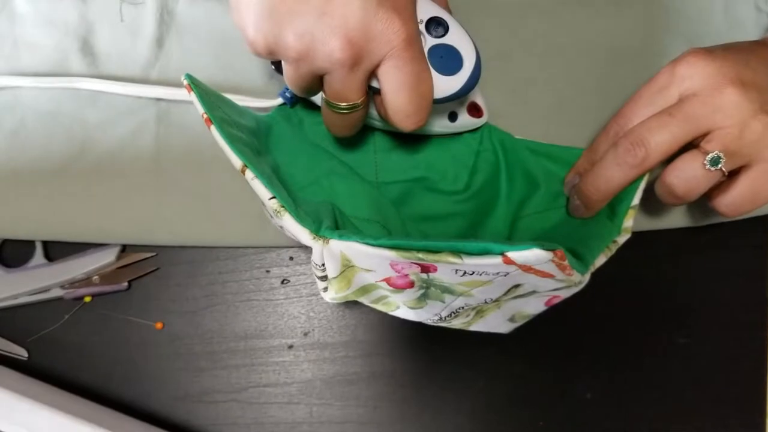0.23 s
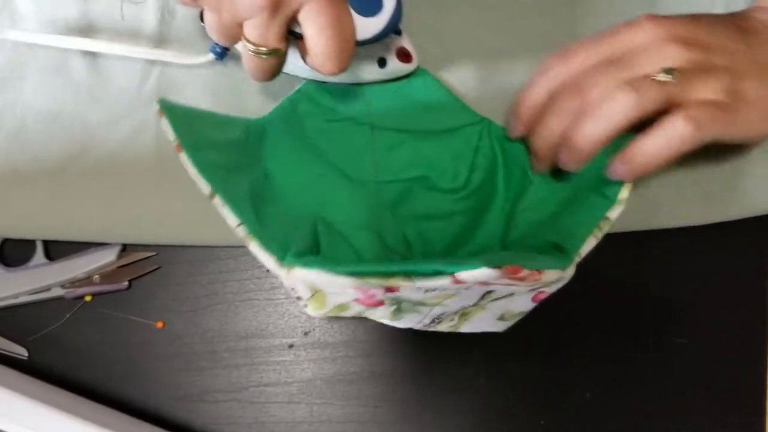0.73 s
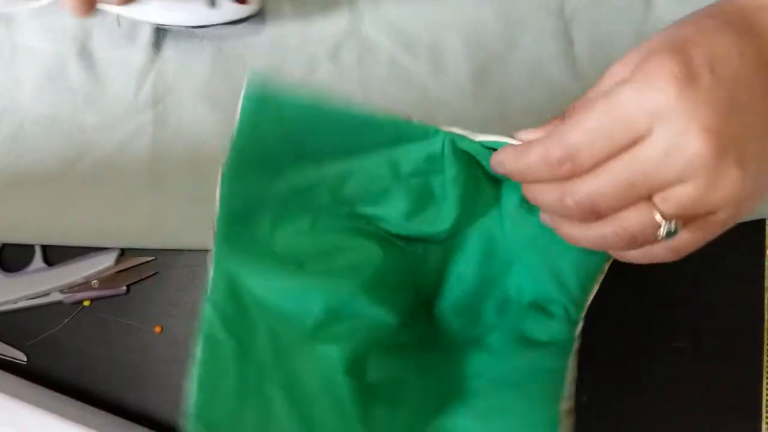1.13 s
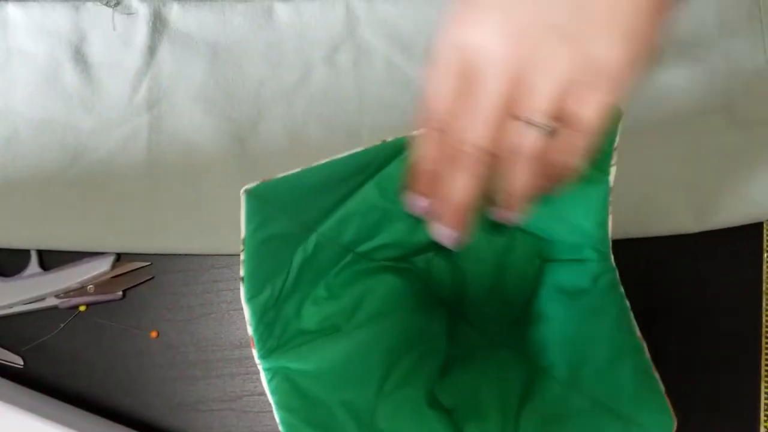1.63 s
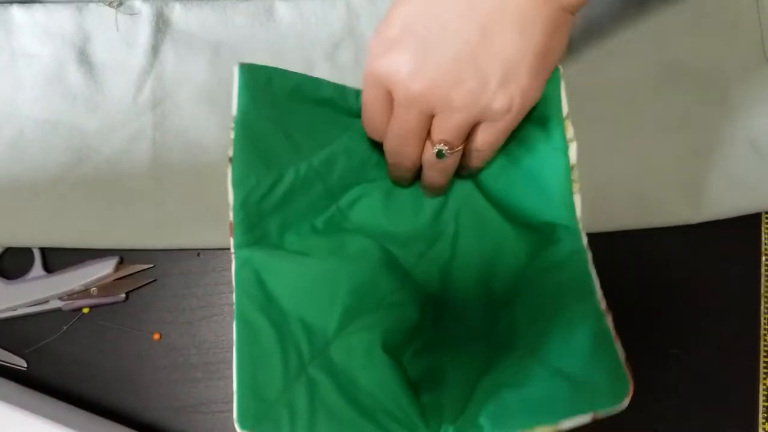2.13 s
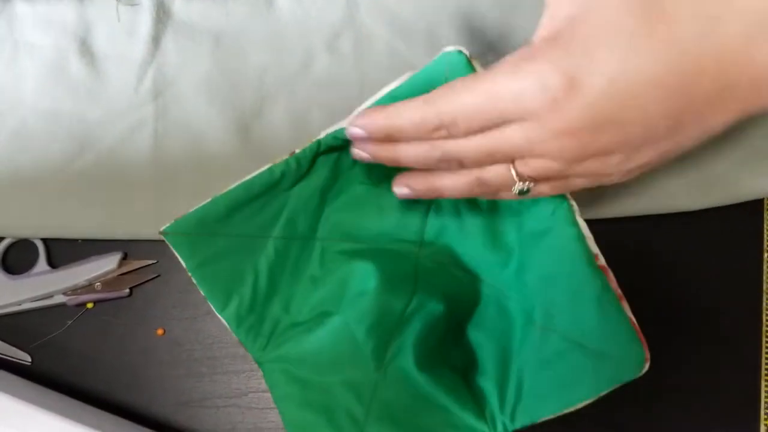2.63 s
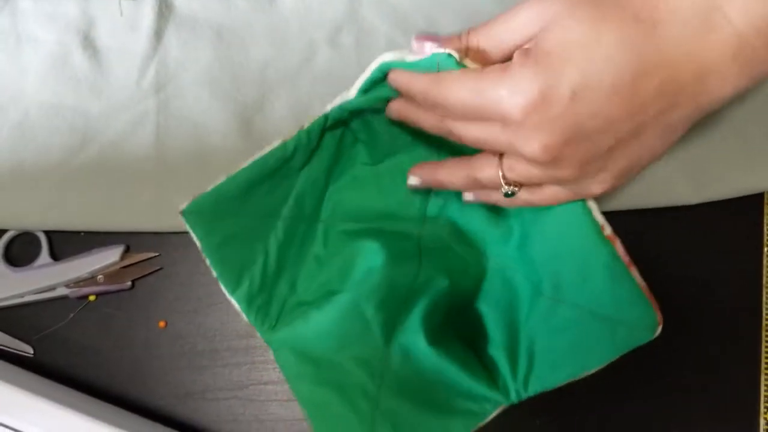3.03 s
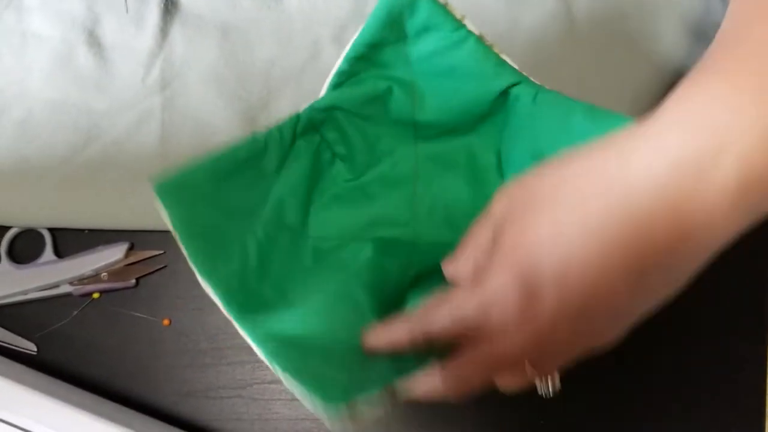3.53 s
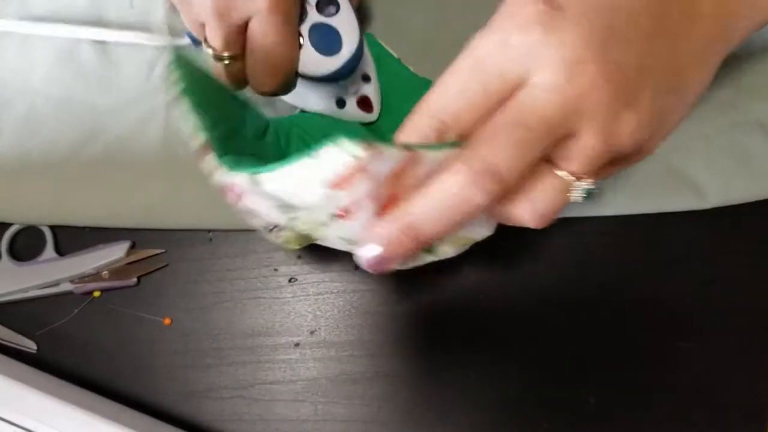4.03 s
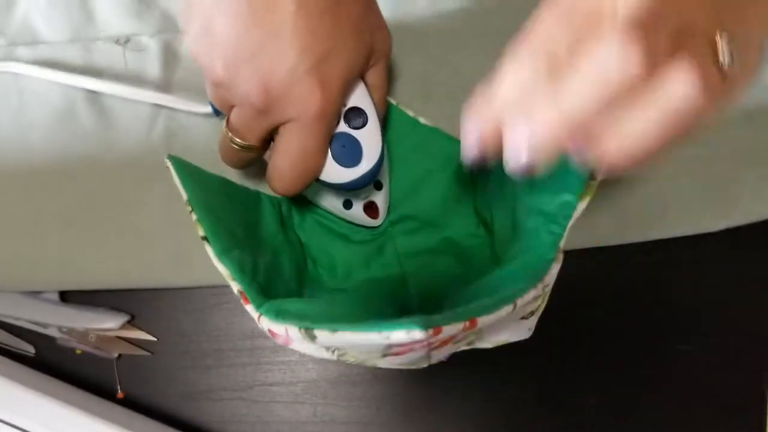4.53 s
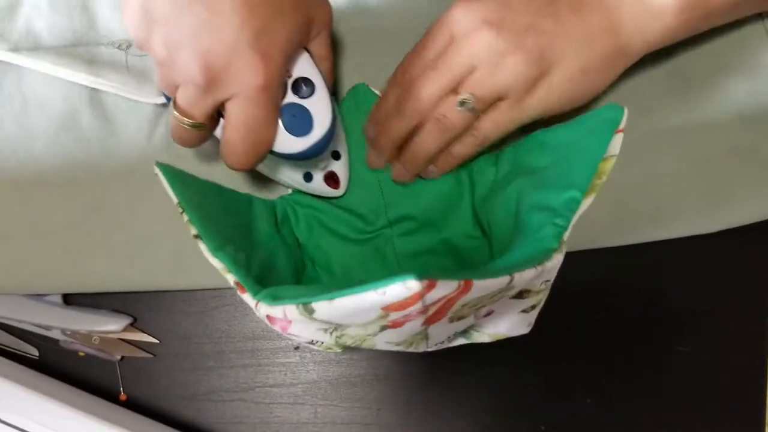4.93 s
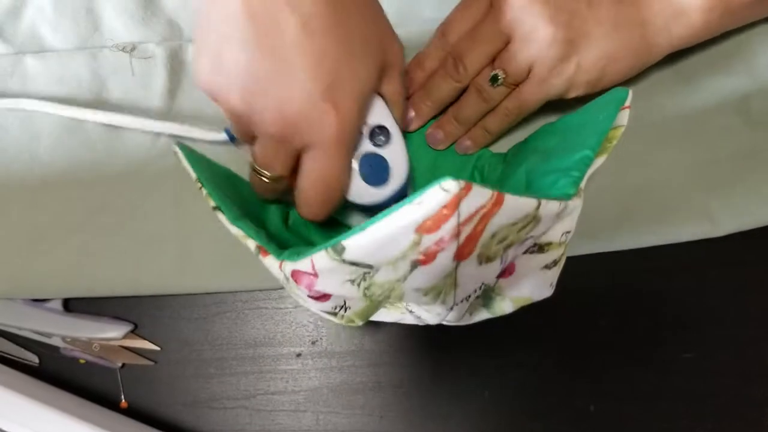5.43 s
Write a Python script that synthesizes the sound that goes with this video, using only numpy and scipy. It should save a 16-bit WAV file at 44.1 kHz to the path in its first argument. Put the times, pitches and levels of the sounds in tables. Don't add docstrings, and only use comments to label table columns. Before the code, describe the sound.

Indoors, over low room rumble and faint hiss, hands buffet the stereo microphones with irregular soft bass puffs. Fabric rustles lightly; a small iron lands in a quick cluster of hollow plastic knocks. A steady far motor hums through the walls during the cloth turning, then dies away. One heavier press thuds on the padded table, then cloth rubs and the iron taps quietly.

```python
import sys
import numpy as np
from scipy import signal
from scipy.fft import rfft, irfft, next_fast_len
from scipy.io import wavfile
from scipy.ndimage import map_coordinates

SR = 44100
rng = np.random.default_rng(int(sys.argv[2]) if len(sys.argv) > 2 else 0)


def dump(signal):
    limited = np.clip(np.atleast_2d(signal).T, -1, 1)
    pcm = np.round(limited * 32767).astype(np.int16)
    wavfile.write(sys.argv[1], SR, pcm)


def volts_from_db(level):
    exponent = np.asarray(level, float) / 20
    return 10 ** exponent


N = 250929
T = np.arange(N) / SR
COARSE = T[::64]


def unit(x):
    return x / np.sqrt(np.mean(x ** 2) + 1e-20)


def along(points, hz):
    f, v = np.transpose(points)
    return np.interp(np.log(hz + 1), np.log(f + 1), v)


def curves(rows):
    s, *cols = np.transpose(rows)
    return [np.interp(T, s, c) for c in cols]


def fade(rows, ramp_s):
    inside_s = np.minimum(T - rows[0][0], rows[-1][0] - T)
    return np.clip(inside_s / ramp_s, 0, 1)


def wobble(rate_hz):
    knots = rng.standard_normal(int(N * rate_hz / SR) + 4)
    return map_coordinates(knots, [T * rate_hz])


def filtered(x, response):
    m = next_fast_len(N + SR // 2)
    spectrum = rfft(x, m) * response(np.fft.rfftfreq(m, 1 / SR))
    return irfft(spectrum, m)[..., :N]


def shape(points):
    return lambda hz: volts_from_db(along(points, hz))


def resonant(peaks):
    def response(f):
        total = 0
        for k, (centre, width, db) in enumerate(peaks):
            damping = 1j * f * width
            total = total + (-1) ** k * volts_from_db(db) * damping / (centre * centre - f * f + damping)
        return total
    return response


def pair(response, alike):
    def mid_side(hz):
        turn = np.arccos(np.clip(along(alike, hz), -1, 1)) / 2
        return response(hz) * [np.cos(turn), np.sin(turn)]
    mid, side = filtered(rng.standard_normal((2, N)), mid_side)
    return unit(np.array([mid + side, mid - side]))


def panned(db):
    return volts_from_db(np.array([db / 2, -db / 2]))


def add(track, s, sound):
    part = track[..., round(s * SR):][..., :sound.shape[-1]]
    part += sound[..., :part.shape[-1]]


def swells(rows):
    s, rise, fall, db = np.transpose(rows)[:4, :, None]
    away = np.abs(COARSE - s) / np.abs(np.where(COARSE < s, rise, fall))
    return volts_from_db(db - 12 * np.minimum(away, 9) ** 1.33)


def joined(gains):
    return np.interp(T, COARSE, np.sqrt(np.sum(gains ** 2, axis=0)))


# pitch_hz, density_db_per_hz
RUMBLE = [(88, -39.5), (150, -5), (156, -7.5), (214, -13.5), (306, -15), (337, -11.5), (421, -7),
          (452, -10.5), (505, -12.5), (1000, -27), (1300, -56), (2200, -120)]
# pitch_hz, density_db_per_hz
WHIRR = [(700, -20), (1000, -1), (1500, -0.5), (1750, -8.5), (2100, -12.5), (3200, -26), (4500, -46.5)]
# pitch_hz, density_db_per_hz
BASS = [(30, -37.5), (55, -0.5), (110, -6), (150, -8), (190, -27), (300, -120)]
# pitch_hz, density_db_per_hz
HISS = [(1500, -33), (3000, -10), (5000, -9), (8000, -21), (10000, -14), (12000, 0.5), (14000, -1),
        (16000, 1)]
# pitch_hz, likeness (-1 to 1)
ALIKE = [(60, .85), (300, 0.95), (650, 0.76), (1150, 0.22), (3000, -0.0093), (8000, 0.14), (15000, 0.035)]
# time_s, level_db
TRAFFIC = [(0, -71), (.7, -68), (1.15, -67), (1.45, -62), (1.8, -66.5), (2.5, -66), (2.8, -70),
           (3.5, -67.5), (3.75, -65.5), (4.3, -67), (5.69, -72)]
RUMBLE_DB, RUMBLE_FOLLOWS = -50, .12
LULL_S, LULL_SPAN_S, LULL_DB, LULL_BACK_DB_PER_S = 4.25, 0.16, -5.5, 0.8
HISS_DB, HISS_DUCKS = -68.5, .5


def room():
    roar_db, = curves(TRAFFIC)
    late = T - LULL_S
    lull_db = (LULL_DB + LULL_BACK_DB_PER_S * late) * (1 + np.tanh(late / LULL_SPAN_S)) / 2
    low_db = RUMBLE_DB + lull_db + RUMBLE_FOLLOWS * (roar_db - roar_db.mean())
    rumble = volts_from_db(low_db + 1.83 + 1.08 * wobble(10)) * pair(shape(RUMBLE), ALIKE)
    flutter_db = 1.3 * wobble(14)
    whirr = volts_from_db(roar_db + lull_db + 2.5 + flutter_db) * pair(shape(WHIRR), ALIKE)
    bass = volts_from_db(low_db + 1.0 + 1.5 * wobble(9.1)) * pair(shape(BASS), [(100, 0.99)])
    hiss = volts_from_db(HISS_DB + HISS_DUCKS * lull_db) * pair(shape(HISS), [(5000, -.05)])
    return rumble + whirr + bass + hiss


# time_s, pitch_hz, level_db
DRONE = [(.4, 124, -56), (.62, 125.8, -43.5), (1, 126.7, -37), (1.3, 127.4, -38), (1.6, 128.6, -35),
         (1.86, 131.3, -34), (2.2, 132.3, -34.5), (2.45, 131.2, -34.5), (2.7, 130.8, -36),
         (2.94, 129.6, -35), (3.38, 125.7, -39), (3.7, 123, -40.5), (3.95, 121.6, -46), (4.2, 121.3, -52),
         (4.75, 119.1, -56.5)]
# pitch_hz, level_db
MAINS = (59.5, -55.5)


def drone():
    hz, db = curves(DRONE)
    turn = 2 * np.pi * np.cumsum(hz) / SR + 0.046 * wobble(6.8)
    engine = fade(DRONE, 0.14) * volts_from_db(db + 0.89 * wobble(7.39)) * np.sin(turn)
    mains_hz, mains_db = MAINS
    mains = volts_from_db(mains_db + 1.9 * wobble(7)) * np.sin(2 * np.pi * mains_hz * T + 1.1 * wobble(4.9))
    return np.sqrt(2) * (engine + mains)


# pitch_hz, density_db_per_hz
AIR = [(8.8, -50.5), (15, -24.5), (49, -3), (70, -3.5), (173, -20.5), (300, -31.5), (390, -67), (660, -120)]
# peak_s, spread_s, level_db, left_right_db
GUSTS = [(.04, 0.092, -33.5, 1.5), (.19, .08, -33.5, -4), (.5, 0.27, -47, 11), (.85, .3, -45.5, -8),
         (1.3, .2, -45, -13.5), (1.65, 0.29, -41.5, 2), (2.09, 0.077, -49, -28), (2.27, .07, -39, 10),
         (2.6, 0.21, -35.5, -11), (2.8, .08, -41.5, 6), (3.1, 0.28, -50, -1), (3.68, .08, -49, -10),
         (3.94, 0.2, -50.5, -7), (4.74, 0.11, -54.5, -23), (4.979, 0.12, -45.5, -25)]
# centre_s, peak_db, pitch_hz
LEFT_PUFFS = [(0.046, -30.5, 67), (0.24, -27, 70.4), (0.323, -31, 75), (0.503, -37, 60), (1.588, -36, 74),
              (1.665, -31.0, 63), (2.255, -23, 71.4), (2.756, -19.5, 80), (2.801, -37, 74),
              (2.932, -27, 67), (3.005, -31, 70.8)]
# centre_s, peak_db, pitch_hz
RIGHT_PUFFS = [(0.167, -15, 75), (0.72, -27.5, 64), (0.853, -24, 79), (0.914, -32, 61), (0.996, -36, 85),
               (1.242, -17, 85), (1.288, -32, 66), (1.378, -39, 69), (1.447, -33, 68.1), (1.527, -35, 66.9),
               (1.575, -24.5, 79), (2.105, -24, 69.9), (2.17, -31, 70), (2.419, -17.5, 74.9),
               (2.546, -22.5, 68), (2.596, -29, 59), (2.683, -21, 72), (3.661, -29, 67.6), (4.719, -32, 67),
               (4.986, -29.5, 77)]
STILL_AIR_DB = -62.5


def draught():
    gains = swells([(s, spread, spread, db) for s, spread, db, _ in GUSTS])
    sides = panned(np.array(GUSTS)[:, -1])
    flow = np.array([joined(gains * side[:, None]) for side in sides])
    lumps = volts_from_db(3.55 * np.array([wobble(10), wobble(16)]))
    turbulence = unit(lumps * pair(shape(AIR), [(60, 0.36)]))
    air = (volts_from_db(1.65) * flow + volts_from_db(STILL_AIR_DB)) * turbulence
    t = np.arange(-SR // 20, SR // 10) / SR
    puffs = sorted((*row, port) for port, rows in enumerate((LEFT_PUFFS, RIGHT_PUFFS)) for row in rows)
    phases = rng.normal(0, 0.79, len(puffs))
    swell = np.exp(-(t / np.where(t < 0, .009, .017)) ** 2)
    for (s, peak_db, hz, port), phase in zip(puffs, phases):
        wave = np.cos(2 * np.pi * hz * t * (1 - 6 * t) + phase)
        octave = 2 * wave ** 2 - 1
        add(air[port], max(s + t[0], 0), -volts_from_db(peak_db) * swell * (wave + 0.37 * octave))
    return air


# start_s, peak_db, pitch_hz, t60_s, left_right_db
TICKS = [
    (0.377, -45, 2200, 0.023, -2.5),
    (0.888, -46, 9000, 0.0073, -1),
    (.949, -44, 5000, 0.024, 3),
    (2.076, -60, 8900, 0.16, -0.5),
    (4.0645, -35.5, 8800, .009, 6),
    (4.672, -63, 8000, 0.0091, -2),
    (5.119, -59.5, 2500, .015, -2),
    (5.173, -45, 2800, .028, -2.5),
]


def ticks():
    out, t = np.zeros((2, N)), np.arange(SR // 15) / SR
    for s, db, hz, t60, lean_db in TICKS:
        decay = volts_from_db(-60 * t / t60) + volts_from_db(-22.5 - 60 * t / .09)
        snap = rng.standard_normal((2, len(t))) * decay
        snap = signal.lfilter(*signal.iirpeak(min(hz, 9200), .45, SR), snap)
        snap = signal.lfilter(*signal.butter(1, min(3 * hz, 20000), fs=SR), snap)
        add(out, s, volts_from_db(db) * panned(lean_db)[:, None] * snap)
    return out


# pitch_hz, density_db_per_hz
FIZZ = [(1470, -32), (2500, -1.5), (3890, -6.5), (4210, -1), (7130, -4.5), (7950, -3.5), (10900, -2.5),
        (14600, -2), (16000, -21)]
# pitch_hz, density_db_per_hz
BODY = [(700, -31), (1100, 0), (1700, -2), (2050, -5), (2600, -6), (4500, -11), (6000, -31)]
# pitch_hz, width_hz, level_db
PAD = [(273, 29, -5.5), (376, 14.3, 0), (429.6, 13, 2), (645, 215, -12.5), (1700, 270, -20),
       (2055, 130, -17.5)]
# peak_s, rise_s, fall_s, fizz_db, body_over_fizz_db
STROKES = [(.375, .015, .04, -84, 18), (.39, 0.067, .3, -75, 6), (.63, 0.26, 0.32, -70, .5),
           (.94, 0.2, 0.16, -65, 2.5), (.955, .012, 0.027, -70, 15), (1.33, .03, .3, -80.5, 11),
           (1.54, .1, 0.17, -81, 11), (1.95, 0.24, .08, -78.5, 4), (2.56, .06, .12, -95, 19),
           (3.76, 0.13, 0.42, -91.5, 16), (4.07, 0.034, .06, -65.5, 1), (4.245, 0.09, 0.11, -61.5, 5),
           (4.329, 0.094, 0.078, -54.5, 2.5), (4.78, .1, 0.23, -72.5, 1.5), (5.04, .17, 0.096, -73.5, 4.5),
           (5.179, .012, .06, -80, 16), (5.39, 0.12, .1, -73.5, 6), (5.45, .06, .1, -75.5, 14),
           (5.51, .03, .12, -80.5, 14)]
# peak_s, rise_s, fall_s, fizz_db
FLICKS = [(1.7, 0.16, .1, -77.5), (1.82, .05, .1, -77.5), (2.02, 0.043, 0.031, -72.5),
          (2.085, 0.042, 0.045, -68), (2.16, 0.056, 0.24, -71), (2.325, 0.045, 0.054, -71),
          (2.74, .03, .15, -80), (2.9, 0.087, .04, -71.5), (2.97, .021, .03, -75), (3.045, 0.042, .11, -69),
          (3.2, .1, .1, -79), (3.34, .04, 0.21, -75), (3.51, 0.14, 0.16, -74)]
# peak_s, rise_s, fall_s, level_db
GLIDE = (4.305, .11, .085, -37)
FLICK_BODY_DB = -11


def cloth():
    moves = np.array(STROKES + [(*row, FLICK_BODY_DB) for row in FLICKS])
    gains = swells(moves)
    grain_db = 0.92 * wobble(40) + .9 * wobble(300)
    fizz = joined(gains) * volts_from_db(6.0 + grain_db) * pair(shape(FIZZ), ALIKE)
    body = joined(gains * volts_from_db(moves[:, -1:])) * volts_from_db(3.5 + grain_db) * pair(shape(BODY), ALIKE)
    glide = joined(swells([GLIDE])) * volts_from_db(.8 * grain_db) * pair(resonant(PAD), ALIKE)
    return volts_from_db([[.55], [-.55]]) * (fizz + body) + glide


# start_s, level_db, pitch_hz, length_s
THUDS = [
    (.9555, -17.5, 104, 0.0092),
    (4.004, -3, 95.5, .011),
    (1.177, -27.5, 589, 0.009),
    (1.1, -30, 124, 0.014),
    (1.256, -26.5, 176, 0.017),
]
# pitch_hz, level_db, t60_s
TABLE = [(81.6, -13, 0.25), (105.3, -21.5, 0.33), (138.4, -17.5, 0.25), (201, -22.5, 0.22),
         (306, -26, 0.033), (480, -39, 0.072)]


def thuds():
    out, t = np.zeros(N), np.arange(SR // 3) / SR
    ring = sum(volts_from_db(db - 60 * t / t60) * np.sin(2 * np.pi * hz * t) for hz, db, t60 in TABLE)
    ring = ring * (1 - np.exp(-(t / 0.02) ** 2))
    falling_t = t + 0.00405 * (1 - np.exp(-t / 0.0034))
    for s, db, hz, length in THUDS:
        dent = np.exp(-(t / length - .8) ** 2) * np.sin(2 * np.pi * hz * falling_t)
        add(out, s, volts_from_db(db) * (dent * (1 - np.exp(-t / 0.0018)) + ring))
    return out


# start_s, peak_db, shell_pitch_hz, hollow_db, edge_db
KNOCKS = [(1.134, -36.5, 1510, -19, -11), (1.152, -39, 1470, 6, -9), (1.163, -33.5, 1530, 0, -21.5),
          (1.176, -22, 1504, -8.5, -19), (1.193, -33.5, 1280, 5, -33), (1.254, -28.5, 1700, 0, -19),
          (1.272, -33, 780, 1, -26), (4.009, -23, 1520, -8, -14.5), (4.02, -33.5, 940, -0.5, -10),
          (5.372, -38.5, 1000, 0, -30), (5.394, -45.5, 1220, 4, -15.5), (5.478, -40, 960, -17, -21),
          (5.501, -31, 1480, -4.5, -19), (5.525, -49.5, 950, 6.5, -24), (5.58, -49, 1890, 0, -12),
          (2.549, -44, 800, 1, -28)]
# pitch_hz, width_hz, level_db
SHELL = [(695, 167, -1.5), (977, 207, -0.5), (1273, 176, -0.5), (1520, 200, -0.5), (1840, 430, -5),
         (2600, 390, -10)]
# pitch_hz, density_db_per_hz
EDGE = [(1500, -29), (2500, 1.5), (4500, -6.5), (6500, -16.5), (11000, -15), (16000, -21.5)]
# pitch_hz, level_db, t60_s
HOLLOW = [(203.3, -9, 0.27), (276, -4, 0.17), (341, -6.5, 0.17), (443.5, 5.5, 0.058), (525.5, -3, 0.11),
          (679, -2.5, 0.053)]
RATTLE_T60 = .21


def iron():
    shell, edge = (pair(r, ALIKE) for r in (resonant(SHELL), shape(EDGE)))
    out, t = np.zeros((2, N)), np.arange(SR // 5) / SR
    luck = rng.standard_normal((len(KNOCKS), len(HOLLOW), 2))
    rattle = volts_from_db(-60 * t / 0.012) + volts_from_db(-7.5 - 60 * t / RATTLE_T60)
    rattle = rattle * (1 - np.exp(-t / 0.00046))
    ping_gain = volts_from_db(4.0 - 60 * t / 0.038) * (1 - np.exp(-t / 0.00094))
    for (s, db, hz, hollow_db, edge_db), draw in zip(KNOCKS, luck):
        at = (round(s * SR) + np.arange(len(t))) % N
        crack = rattle * (shell[:, at] + volts_from_db(edge_db + 5.0) * edge[:, at])
        ping = ping_gain * np.sin(2 * np.pi * hz * t + [[0], [1.8]])
        boom = 0
        for (mode_hz, level, t60), (u, v) in zip(HOLLOW, draw):
            phase = 2 * np.pi * mode_hz * (1 + 0.015 * v) * t + [[0], [0.86 * u]]
            boom = boom + volts_from_db(level + 2.44 * u - 60 * t / t60) * np.sin(phase)
        boom = volts_from_db(hollow_db + 5.5) * boom * (1 - np.exp(-t / 0.0029))
        add(out, s, volts_from_db(db - 6.5) * (crack + ping + boom))
    return out


def scene():
    return room() + drone() + draught() + ticks() + cloth() + thuds() + iron()


def roll_off(x):
    return signal.sosfilt(signal.butter(12, 16790, fs=SR, output="sos"), x)


TOP_HZ = 15830


def record(dry):
    ends = np.clip(np.minimum(T / 0.0025, (T[-1] - T) / .008), 0, 1)
    mix = filtered(dry * ends, lambda hz: np.where(hz < TOP_HZ, 1, volts_from_db(-41.5)))
    return roll_off(mix)


dry = scene()
out = record(dry)
dump(out)
```